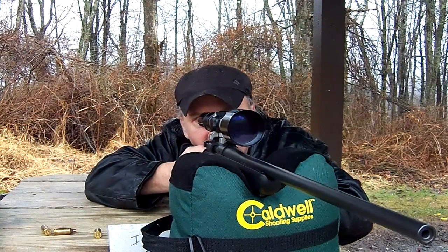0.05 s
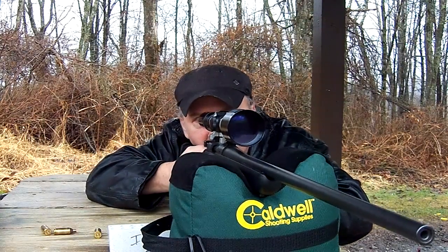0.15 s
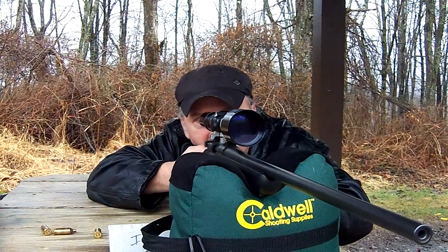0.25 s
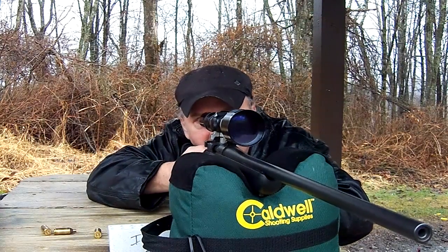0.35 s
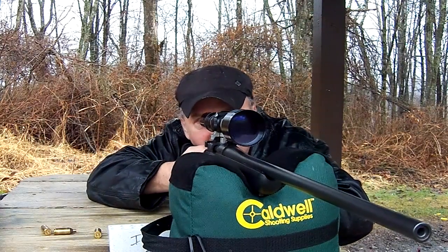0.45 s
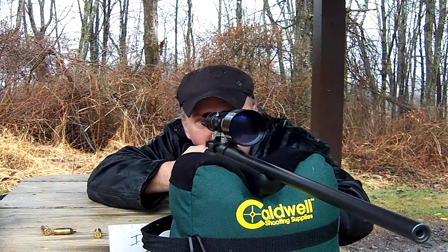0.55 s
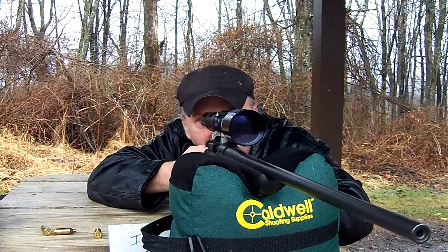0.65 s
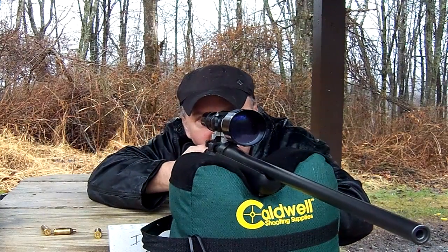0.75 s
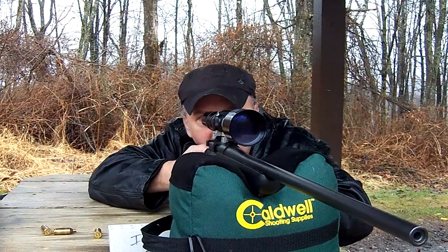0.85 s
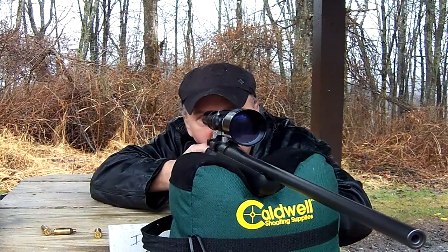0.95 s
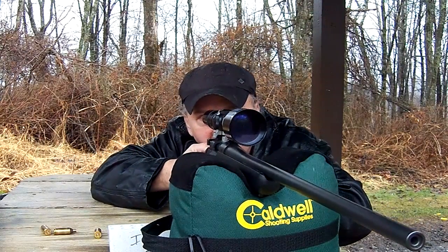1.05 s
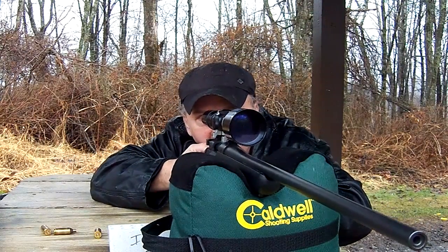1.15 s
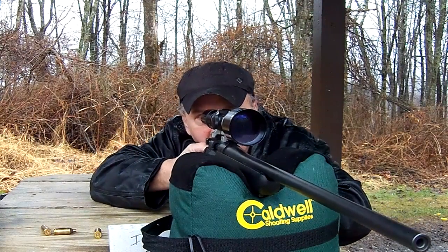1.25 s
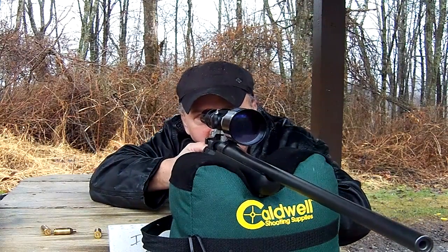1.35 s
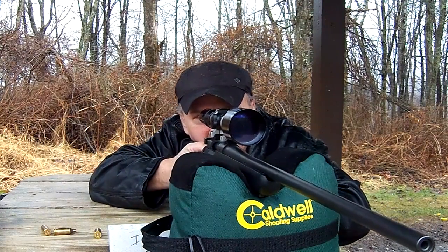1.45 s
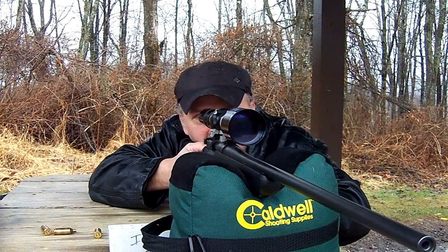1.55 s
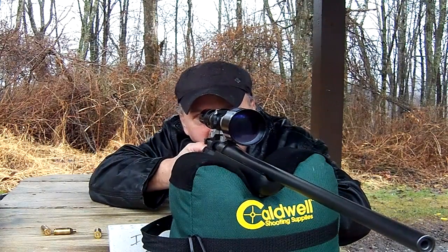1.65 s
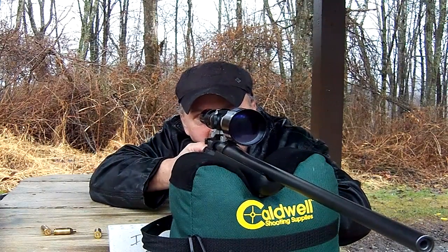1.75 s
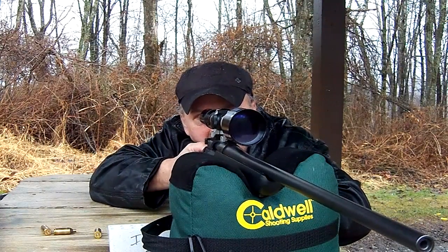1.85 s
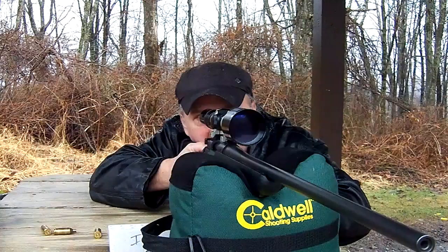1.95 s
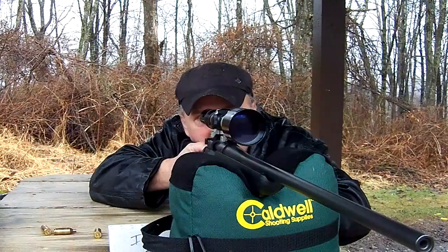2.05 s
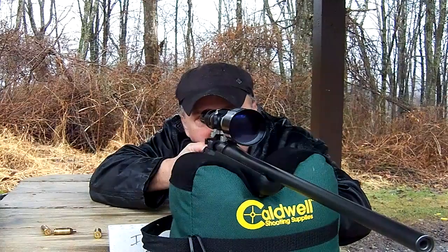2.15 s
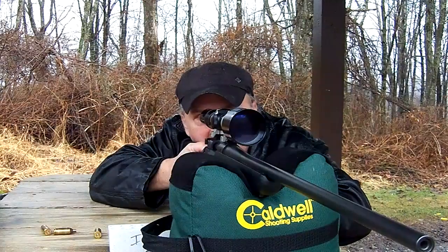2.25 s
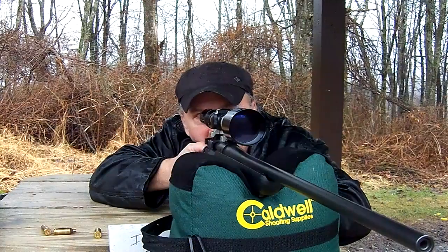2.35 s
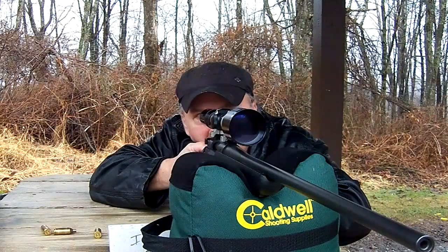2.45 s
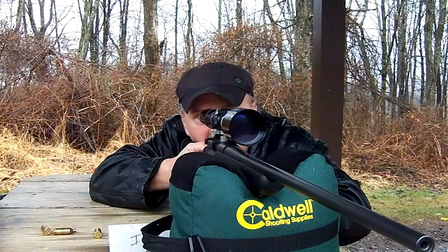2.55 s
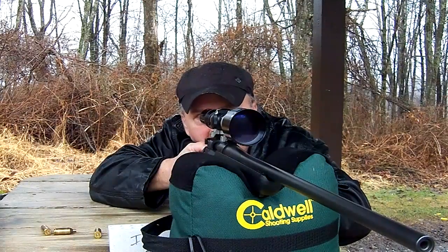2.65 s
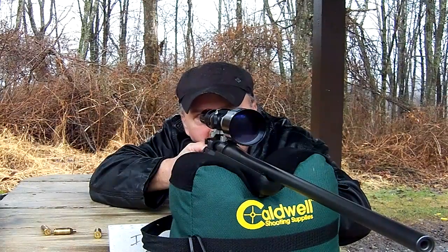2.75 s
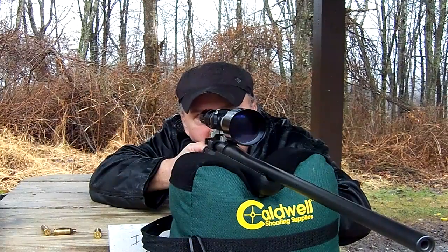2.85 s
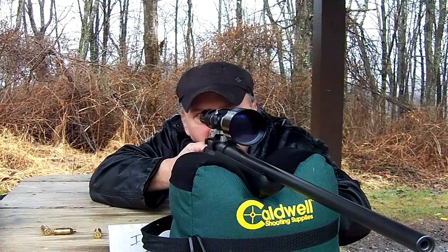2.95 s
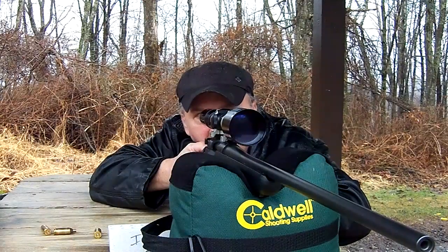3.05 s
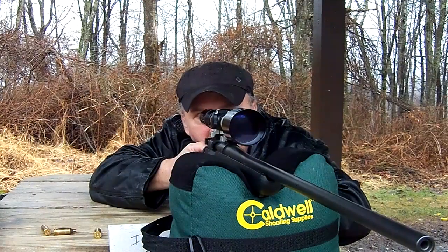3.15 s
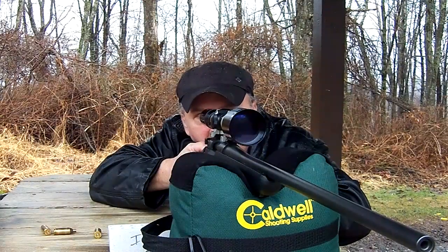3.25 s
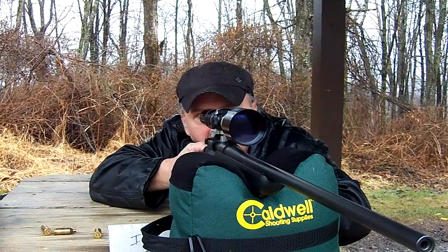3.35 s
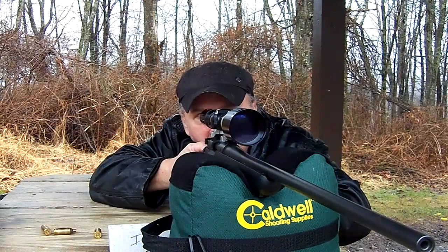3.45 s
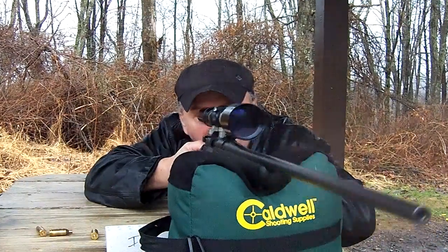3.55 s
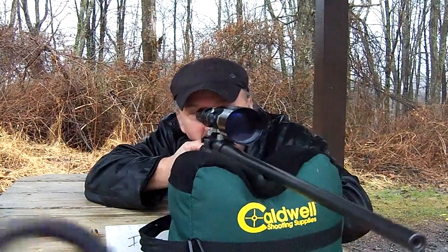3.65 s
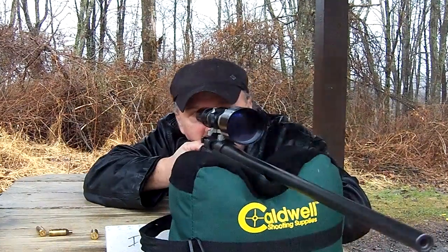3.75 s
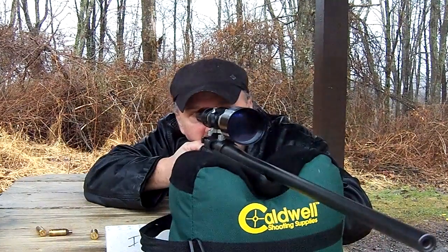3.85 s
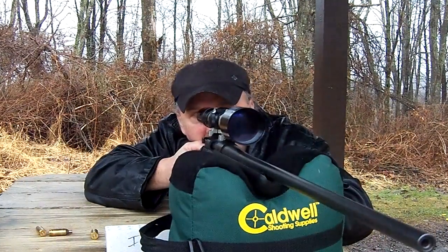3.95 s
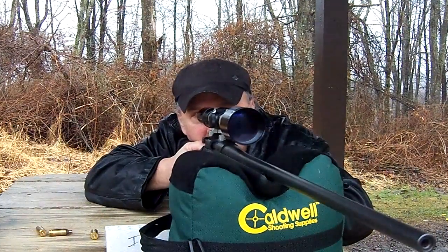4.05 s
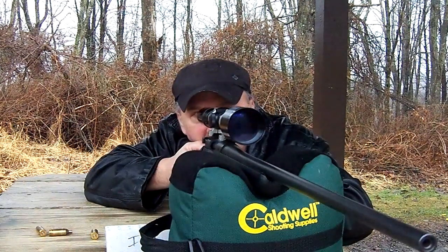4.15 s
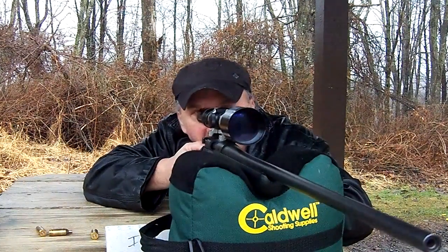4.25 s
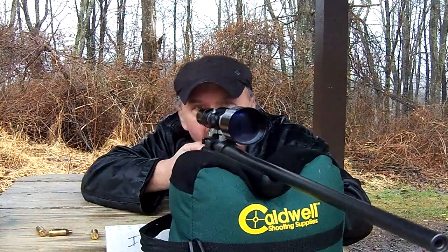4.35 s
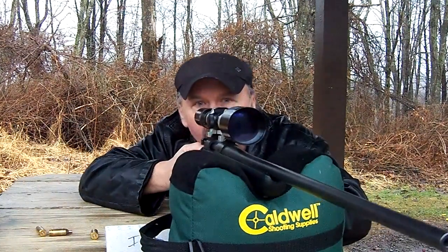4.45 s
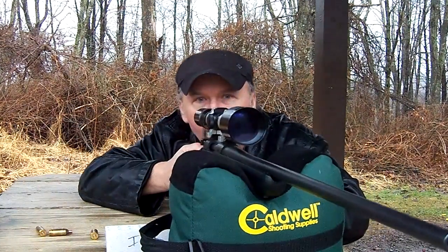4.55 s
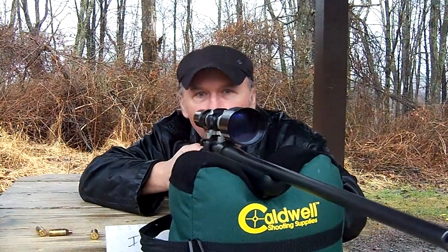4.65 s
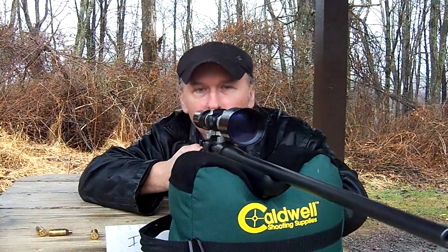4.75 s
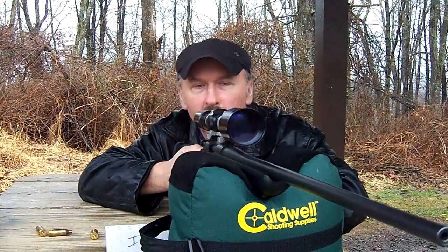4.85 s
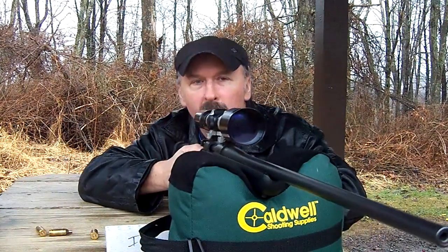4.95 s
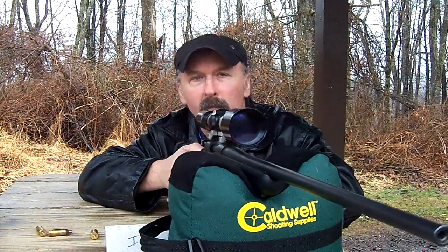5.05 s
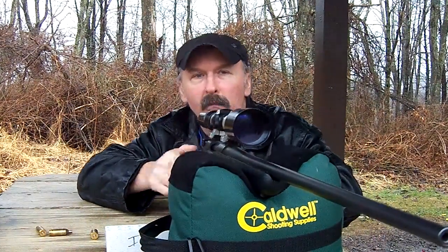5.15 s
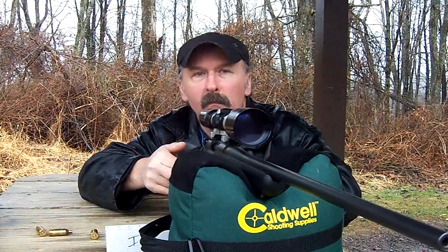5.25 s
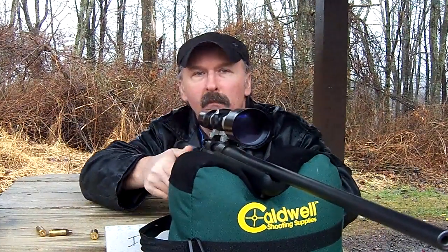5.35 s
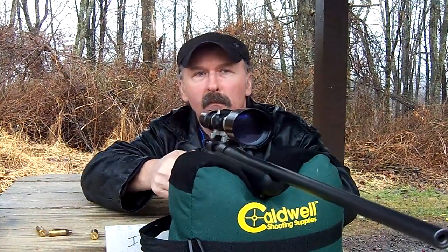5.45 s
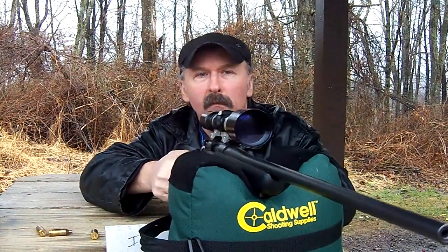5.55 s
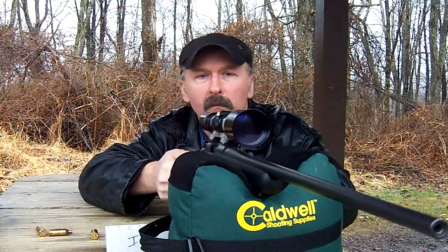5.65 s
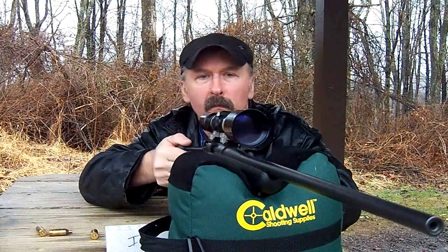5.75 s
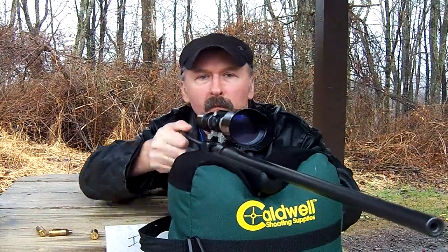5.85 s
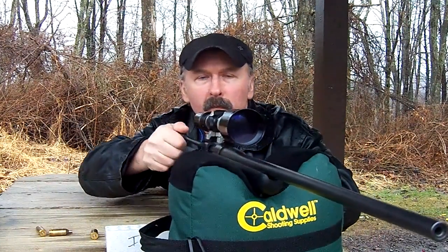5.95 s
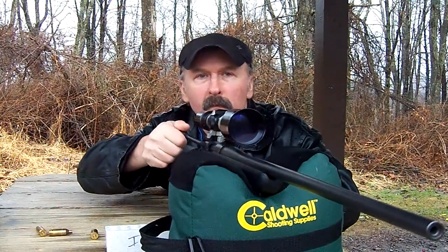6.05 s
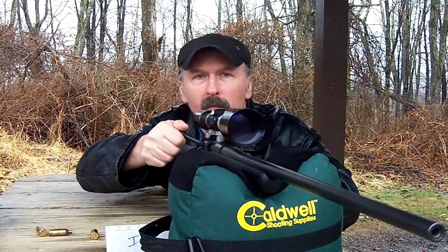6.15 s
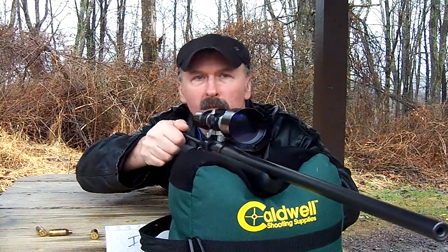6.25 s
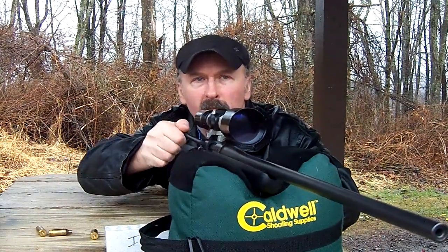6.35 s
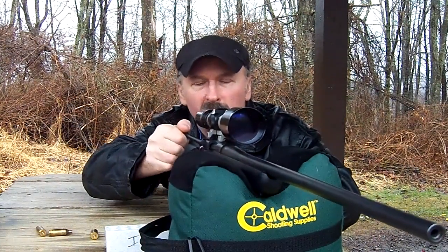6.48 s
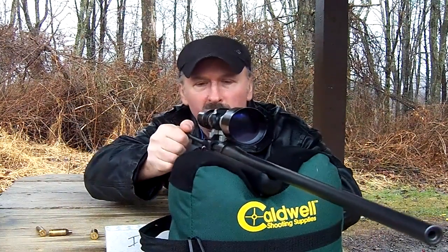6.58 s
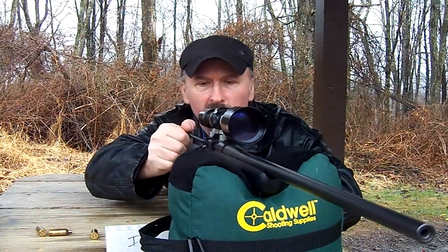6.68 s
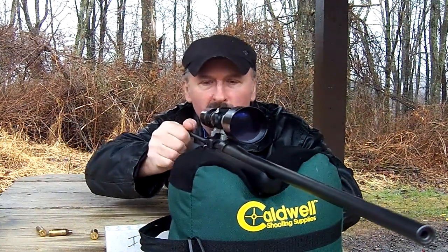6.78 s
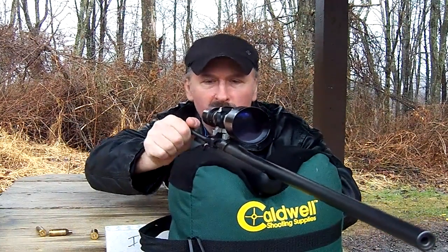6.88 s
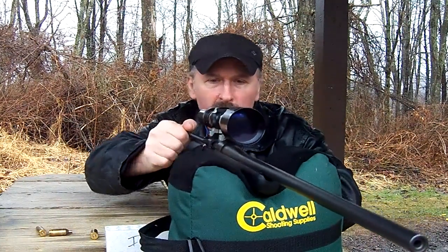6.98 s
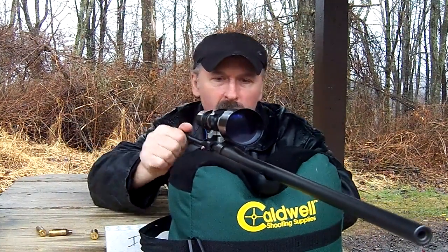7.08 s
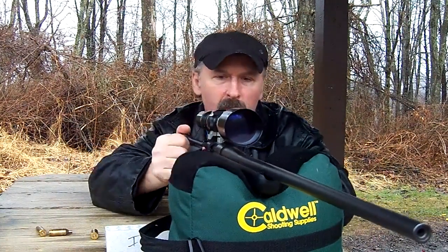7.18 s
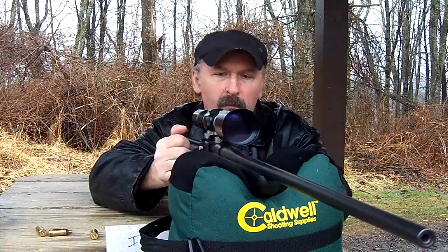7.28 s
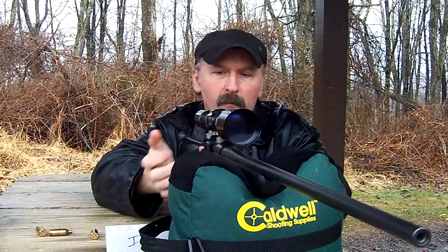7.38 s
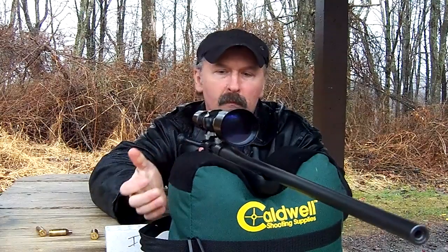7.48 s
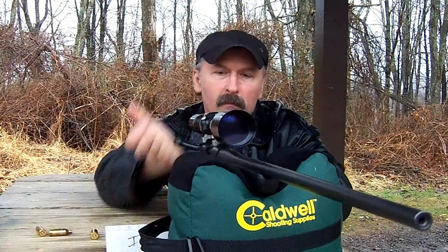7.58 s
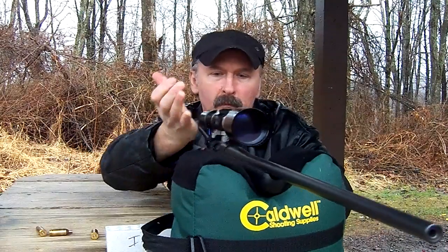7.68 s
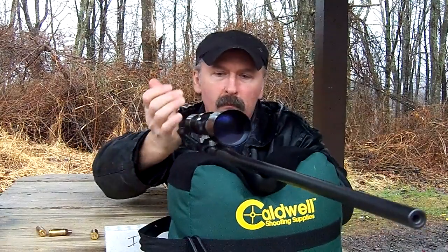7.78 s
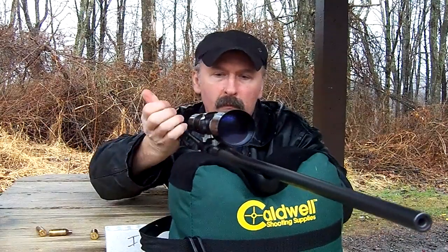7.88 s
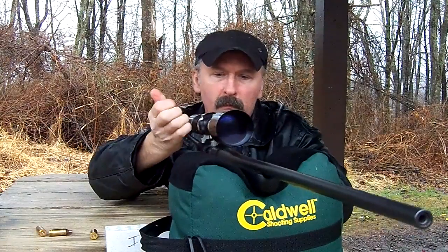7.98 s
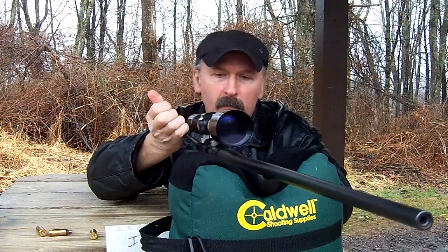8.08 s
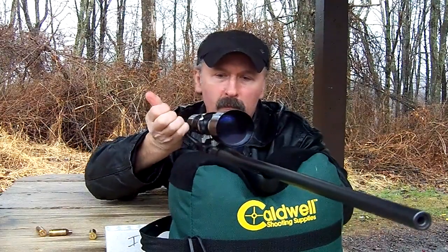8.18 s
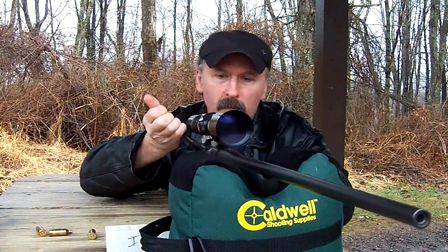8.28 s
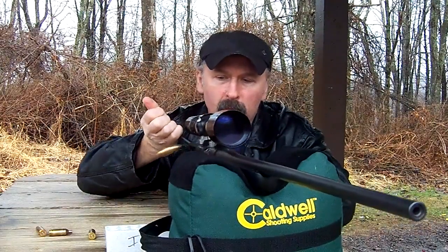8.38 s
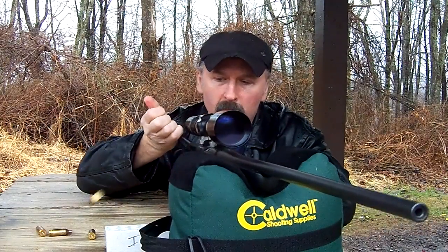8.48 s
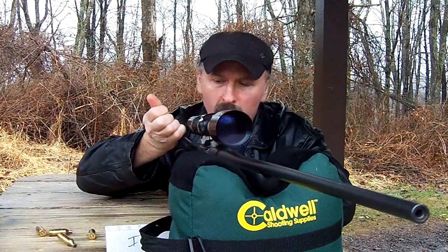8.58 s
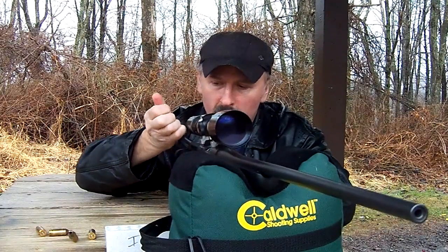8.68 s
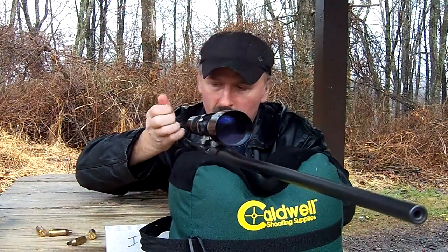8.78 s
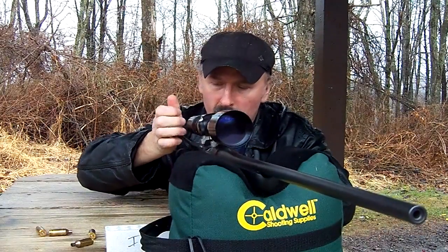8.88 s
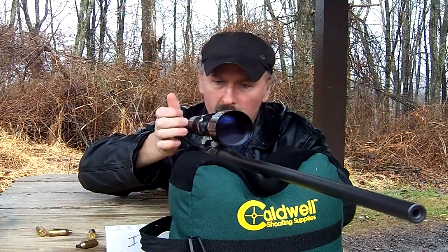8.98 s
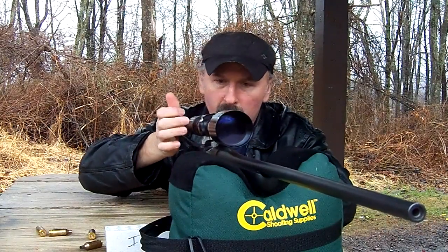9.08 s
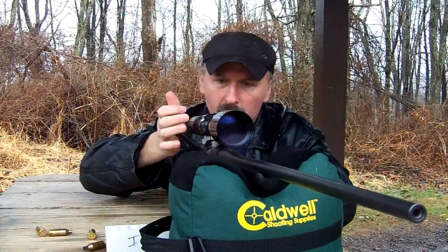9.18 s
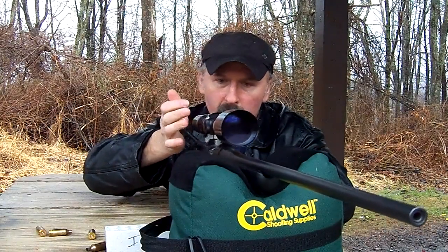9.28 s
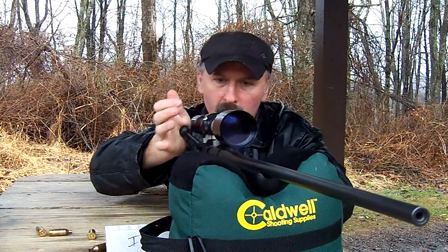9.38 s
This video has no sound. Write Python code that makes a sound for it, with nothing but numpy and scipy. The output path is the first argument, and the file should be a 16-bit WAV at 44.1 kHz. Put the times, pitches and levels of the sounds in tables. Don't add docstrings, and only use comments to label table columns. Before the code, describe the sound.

A close rifle blast breaks the quiet drizzle, rolls away among trees and slopes, followed by metallic bolt work and a spent case knocking wood.

```python
import sys
import numpy as np
from scipy import signal
from scipy.fft import rfft, irfft, next_fast_len
from scipy.io import wavfile
from scipy.ndimage import uniform_filter1d

SR = 44100
rng = np.random.default_rng(int(sys.argv[2]) if len(sys.argv) > 2 else 0)


def store_pcm(level_fs):
    pcm = np.round(np.clip(level_fs, -1, 1) * 32767).astype(np.int16)
    wavfile.write(sys.argv[1], SR, np.atleast_2d(pcm).T)


def gain_from_db(level_db):
    decades = np.asarray(level_db, float) / 20
    return 10 ** decades


N = 415422
T = np.arange(N) / SR
FIRED = 3.5495

# (frequency [Hz], level [dB per Hz])
HISS_TONE = [(880, -21.5), (1500, -3.5), (2040, -1.5), (2730, 0.5), (7630, -2.5), (12500, -7.5),
             (13400, -6.5), (14000, -13)]
# (frequency [Hz], level [dB per Hz])
WASH_TONE = [(150, -37), (250, -3.5), (312, 0), (409, -2), (643, -3.5), (1680, -10.5), (2500, -23),
             (3250, -49), (5500, -120)]
# (frequency [Hz], level [dB per Hz])
RUMBLE_TONE = [(12, -30.5), (20, -2), (70, -1), (166, -7), (236, -10), (258, -8.5), (285, -14), (400, -23),
               (520, -38), (880, -120)]
# (time [s], level [dB])
QUIET_GAIN = [(0, -0.5), (.55, -2), (1.5, 1), (2.4, 2.5), (3.5, 3.5), (3.8, -11), (5.8, -14), (6.45, -10),
              (6.8, -4), (7.38, 0), (7.6, 1), (7.8, -2), (8.27, -2.5), (8.42, -6.5), (9.04, -5),
              (9.42, -4.5)]
# (time [s], peak level [dB], note [Hz], splash [dB])
EARLY_DROPS = [(.0563, -28.5, 3400, 0), (.087, -37, 9000, -2), (.2633, -38, 4300, -3),
               (.3346, -36, 6430, -5), (.4179, -38, 5080, -18), (.7038, -42, 2740, 3.5),
               (.7871, -38, 6170, -6), (.8036, -39, 3490, 0), (1.0286, -34, 5960, -4.5),
               (1.3593, -29.5, 3680, -1.5), (1.4865, -24, 3580, -2.5), (1.6077, -35, 4160, -2),
               (1.6412, -34.5, 7900, -6), (1.9126, -38, 4060, -6), (2.0373, -28.5, 4600, -4),
               (2.144, -29.5, 8300, -7), (2.2458, -40.5, 3120, 5), (2.5252, -32.5, 9300, -11),
               (2.5631, -33, 4630, -9), (2.596, -43, 8500, -10), (2.6469, -28, 10300, -15),
               (2.7053, -32, 4230, -10), (2.7896, -44, 6500, 2), (2.8972, -40, 7330, 3),
               (2.916, -20.5, 3510, -4.5), (2.9891, -36, 5400, -4), (3.1018, -35, 3480, 3),
               (3.1353, -30, 7400, -6), (3.3807, -35, 8200, -13), (3.4002, -31, 8130, -3)]
# (time [s], peak level [dB], note [Hz], splash [dB])
LATER_DROPS = [(3.534, -38, 6960, 5.5), (4.6748, -44, 3380, 8), (4.8394, -43, 3400, 4.5),
               (5.2669, -55, 7500, 3), (5.5694, -42, 3960, -7), (5.8596, -44, 4560, -1),
               (5.9564, -42.5, 4650, -1), (6.4194, -41, 3270, -12.5), (6.6004, -33, 9400, -14),
               (6.7795, -37, 5200, -14), (6.88, -33, 9500, -20), (6.9346, -33, 6000, -11),
               (6.981, -35, 5630, 4), (7.013, -37, 3620, 1), (7.0994, -38, 5590, -2),
               (7.3854, -34, 3520, 5.5), (7.5707, -35.5, 3700, 10.5), (7.8194, -36, 2520, -2),
               (7.9234, -30, 11200, -20), (8.8994, -35, 11070, -7), (9.196, -32.5, 4160, -7)]
# (time [s], peak level [dB], note [Hz], splash [dB])
LEAF_SPRAYS = [(1.8173, -38.5, 3140, -4), (2.0118, -38, 4100, -4), (2.858, -40.5, 3520, 8),
               (3.4186, -37.5, 8900, -3), (3.5054, -32, 4600, -9), (6.62, -51, 4850, 4),
               (6.6678, -50.5, 4230, 9)]
# (time [s], peak level [dB], note [Hz])
PUDDLE_DRIPS = [(.126, -28.5, 964), (.369, -38.5, 1060), (1.527, -27.5, 835), (1.855, -34, 1140),
                (2.259, -36, 1140), (2.522, -34, 1010), (2.957, -32.5, 720), (2.98, -38, 700),
                (3.148, -25, 832)]
# (time [s], peak level [dB], note [Hz], time to fall 60 dB [s])
SECOND_NOTES = [(.0568, -43, 2600, .053), (1.3593, -41, 2090, .045), (1.4867, -29, 4900, 0.11),
                (2.9186, -24, 4600, 0.092), (2.919, -24.5, 11300, 0.093), (3.054, -26, 930, 0.024),
                (3.068, -26, 700, 0.045), (3.053, -22.5, 549, 0.037), (5.858, -44, 4500, 0.1),
                (5.859, -28.5, 1820, 0.05), (7.631, -15, 414, 0.1), (7.631, -21.5, 175, 0.081),
                (8.566, -28.5, 213, 0.1)]
# (time [s], length [s], level [dB], first pitch [Hz], last pitch [Hz])
BIRD_CALL = (2.799, .042, -44, 5450, 4450)
# (time [s], peak level [dB], centre [Hz],
# width [octaves], time to fall 60 dB [s])
TICKS_AND_SPECKS = [(1.029, -43, 6030, 0.094, .06), (1.4815, -22.5, 2500, 1, 0.017),
                    (1.488, -30, 11100, .04, 0.091), (1.616, -42, 3630, .05, .05), (2.013, -30, 3960, .04, 0.058),
                    (2.79, -20, 5500, 0.52, 0.01), (2.843, -31, 1270, 0.093, 0.076), (2.878, -30, 7500, .5, .01),
                    (2.888, -21, 5000, .4, 0.012), (2.897, -20, 6500, .5, 0.011), (2.912, -19, 3000, 0.89, 0.011),
                    (2.99, -34, 3500, .06, .05), (3.005, -33.5, 1080, .1, .06), (3.06, -33, 4000, .6, .04),
                    (3.095, -37, 9100, 0.027, .08), (3.108, -38, 12300, .03, .1), (3.177, -32, 10500, .3, .012),
                    (4.39, -49, 11000, 0.34, .05), (4.985, -47.5, 8500, .5, .05), (5.125, -49, 8470, 0.62, .05),
                    (5.27, -47, 8780, 0.55, .06), (5.366, -52, 8000, .4, 0.055), (5.748, -43.5, 4500, .1, .04),
                    (5.83, -47, 7500, 0.37, .04), (5.861, -28, 3980, 0.92, 0.016), (6.035, -42, 10040, 0.65, .015),
                    (7.0, -40, 3670, .05, .05), (6.68, -43, 4020, 0.63, 0.1), (7.02, -39, 4500, 0.69, 0.24),
                    (7.385, -36, 9600, 0.33, 0.11), (8.127, -38, 3200, .5, .03), (8.194, -21, 5500, 0.5, .02),
                    (8.334, -26, 415, 0.68, 0.063), (8.3735, -17, 6500, .9, .008), (9.2815, -34, 3530, .7, 0.015),
                    (9.23, -45, 1500, 0.45, .06), (9.237, -38, 7500, .3, .03), (9.254, -38, 10000, .5, .05),
                    (9.338, -49, 8800, .04, 0.046),
                    (.056, -36, 4940, .08, .06), (.057, -38, 8000, .3, .05), (.13, -40, 8500, .2, .015),
                (.178, -40, 7500, .25, .04), (.418, -38, 6500, .3, .025), (.6, -39, 8500, .3, .06),
                (.638, -38, 8000, .2, .04), (.727, -38, 6040, .08, .05), (.893, -39, 3000, .1, .06),
                (1.04, -35, 5600, .08, .05), (2.436, -36, 8100, .2, .02), (8.1485, -32, 2920, .06, .04),
                (8.15, -33, 5000, .08, .06), (8.1945, -20, 3280, 0.056, .04),
                (8.196, -20, 5080, 0.071, 0.066), (8.598, -34, 1530, .04, .15), (8.742, -44, 4200, .35, .1),
                (8.777, -40, 3200, .08, .04), (8.861, -38, 1750, .08, .06), (8.975, -36, 1740, .08, 0.086),
                (9.077, -39.5, 1750, .1, .06), (7.631, -22, 150, .5, 0.11), (5.86, -35, 3200, .03, 0.076),
                (8.645, -36, 4500, .4, .05), (8.789, -42, 4200, 0.46, 0.046), (2.25, -37, 3100, .05, .05),
                (8.334, -14, 10100, .25, .02), (9.063, -42, 4500, .3, .03), (9.083, -41, 5200, .15, 0.043),
                (9.251, -38, 6050, 1.2, .012)]
# (time [s], level [dB], note [Hz], time to fall 60 dB [s])
THIN_METAL_NOTES = [(7.631, -18, 887, 0.066), (7.631, -19, 1930, 0.088), (7.631, -15, 2390, 0.083),
                    (7.632, -20, 5470, .1), (7.632, -14, 6170, 0.09), (7.632, -5.5, 10770, .06),
                    (8.318, -34, 13900, .12), (8.33, -24, 13800, .06), (8.337, -20, 13800, 0.069),
                    (8.372, -35, 13880, 0.12), (8.39, -29, 13940, 0.11), (9.2475, -44.5, 4010, .08),
                    (9.282, -42, 2000, .04), (9.321, -47, 4830, .04), (9.371, -35, 12600, .05),
                    (9.379, -28, 3060, 0.12), (9.391, -22, 2940, 0.055), (9.394, -8.5, 9700, 0.05),
                    (9.407, -15, 2990, 0.06), (9.412, -16, 9700, .1)]
# (time [s], peak level [dB], low knock [dB], high knock [dB], tick [dB])
CASE_BOUNCES = [(8.5649, -8, -12, 0.5, -25), (8.6444, -23.5, -9.5, -6, -17), (8.742, -54, -18, 0, -3),
                (8.778, -43.5, -6, -3, -14), (8.789, -25, -14, 5, -11), (8.82, -27, -11.5, 3, -12),
                (8.86, -40, -7, 0, -14), (8.874, -43, -15, 3, -12), (8.975, -39, -13, 0, -20),
                (8.989, -45, -13, -2, -20), (9.005, -46, -2.5, -3, -25), (9.078, -44, -10, 0, -13)]
# (frequency [Hz], level [dB], time to fall 60 dB [s])
PLANK_NOTES = [(273, -9.5, 0.18), (425, -14, 0.11), (473, 0.5, 0.12), (547, 6.5, .033), (667, 2, 0.076),
               (893, -2, 0.082), (1040, -11, 0.098), (1130, -2, .08), (1275, 10, 0.057), (1490, 10, 0.038),
               (1680, 6, 0.034), (2250, 3.5, 0.055), (3905, -10, .045), (4550, -15, .045)]
# (frequency [Hz], width [Hz], level [dB])
STEEL_NOTES = [(2960, 110, 7.5), (3400, 110, -27), (5450, 130, -7), (6110, 91, 6), (7900, 83, -19.5),
               (9700, 90, -4), (10100, 300, -2), (13980, 360, -8)]
# (time [s], peak level [dB], time to fall 60 dB [s], loudest region [Hz])
BOLT_UNLOCK = [(7.618, -18, 0.1, 2500), (7.6245, -16, .05, 6500), (7.629, 2.5, 0.051, 3500),
               (7.632, 7, 0.047, 4500), (7.6436, 2.5, 0.032, 9600), (7.668, -16, .06, 9000)]
# (time [s], peak level [dB], time to fall 60 dB [s], loudest region [Hz])
BOLT_DRAW = [(7.997, -26.5, 0.041, 2360), (8.08, -35, .05, 5500), (8.1275, -33, 0.02, 4500),
             (8.131, -36, 0.11, 3200), (8.141, -41, .05, 8000), (8.1485, -25, 0.07, 3560),
             (8.162, -36, .08, 4500), (8.1755, -29, 0.17, 2000), (8.190, -24, .04, 4000),
             (8.1933, -15, .03, 3500), (8.1956, -19, 0.035, 4800), (8.2055, -26, .05, 5000),
             (8.213, -28, .04, 5000), (8.259, -35.5, 0.22, 2500), (8.28, -34, 0.14, 4470)]
# (time [s], peak level [dB], time to fall 60 dB [s], loudest region [Hz])
BOLT_EJECT = [(8.31, -16, .026, 4000), (8.316, -5.5, 0.03, 4360), (8.3262, -10, 0.025, 4500),
              (8.3333, -1.5, 0.06, 5900), (8.336, -13, 0.11, 5000), (8.3735, -11.5, 0.019, 5660),
              (8.378, -24, 0.065, 5950), (8.391, -38, 0.047, 6300)]
# (time [s], peak level [dB], time to fall 60 dB [s], loudest region [Hz])
BOLT_CLOSE = [(9.249, -43.5, .081, 4030), (9.2815, -36, .03, 3000), (9.3214, -45, .053, 4800),
              (9.3703, -17, 0.027, 12500), (9.3757, -15, 0.17, 5000), (9.388, -12, 0.035, 3000),
              (9.3899, -5.5, 0.04, 6100), (9.396, -5, .07, 8050), (9.4027, -6, 0.065, 8040),
              (9.4061, -8.5, 0.11, 3400), (9.4114, -4.5, 0.062, 8040)]
# (ring of the steel [dB], broad crack [dB])
BOLT_STROKES = [
    (-7, -2),
    (-8, 7),
    (-14, -0.5),
    (3.5, 0),
]
# (frequency [Hz], level [dB per Hz])
BLAST_TONE = [(180, -36.5), (300, -2), (423, -4), (559, -7.5), (616, -5), (4540, -15), (12100, -34),
              (14300, -45), (15000, -115)]
# (level [dB], time to fall 60 dB [s])
TREE_ECHOES = [
    (3.5, 0.38),
    (-10, 1.695),
    (-24.5, 5.27),
]
# (frequency [Hz], loss [dB per s of travel])
AIR_DULLING = [(500, 4), (1000, 2.5), (1500, -4), (3000, 5.5), (5000, 19), (8000, 42), (10500, 67.5),
               (13000, 100.5)]
# (frequency [Hz], level [dB per Hz])
BOOM_TONE = [(29, -51), (48, -13.5), (95, -12.5), (132, 3.5), (175, -4), (260, -2), (353, 3.5), (431, -6.5),
             (585, 1.5), (677, -14), (1200, -17.5), (1560, -47.5), (2640, -120)]
# (frequency [Hz], level [dB per Hz])
ROLL_TONE = [(24, -47), (40, -17.5), (189, 3.5), (343, -2.5), (463, -17), (521, -9), (676, -16), (740, -10),
             (900, -14.5), (1170, -52), (1980, -120)]
# (delay [s], level [dB], spread [s])
FAR_SLOPES = [
    (0.399, -29, .25),
    (1.45, -37, .6),
    (2.5, -49.5, 1.1),
]
# (delay [s], rise [dB])
SLAP_ECHOES = [(.503, 2), (.62, 4), (.70, 6), (.797, 14), (.89, 9), (1.155, 5), (1.369, 7.5), (1.5, 4),
               (1.66, 3.5), (1.85, 4), (2.03, 4), (2.2, 6)]
# (time [s], level [dB])
OVERLOAD_POINT = [(3.55, -5.2), (3.575, -4.1), (3.63, -4.2), (3.7, -7.6), (3.8, -8.6), (3.97, -9.6),
                  (4.04, -7), (6.2, -7), (7, -4), (7.7, -4), (8.3, -5.5), (9.3, -8)]


def unit(x):
    return x / np.sqrt(np.mean(x ** 2) + 1e-20)


def along(points, hz):
    f, v = np.transpose(points)
    return np.interp(np.log(hz + 1), np.log(f + 1), v)


def curve(points):
    return np.interp(T, *np.transpose(points))


def filtered(x, response):
    m = next_fast_len(len(x) + 8192)
    return irfft(rfft(x, m) * response(np.fft.rfftfreq(m, 1 / SR)), m)[:len(x)]


def hump(hz, octaves):
    return lambda f: np.exp(-(np.log2((f + 1) / hz) / octaves) ** 2)


def rush(spectrum, patchy_db):
    z = signal.stft(rng.standard_normal(N), nperseg=512)[2]
    field = uniform_filter1d(rng.standard_normal(z.shape), size=8, axis=0)
    field = uniform_filter1d(field, size=6, axis=1)
    patchy = signal.istft(z * gain_from_db(patchy_db * unit(field)), nperseg=512)[1][:N]
    return unit(filtered(patchy, lambda hz: gain_from_db(along(spectrum, hz))))


def add(track, s, sound):
    part = track[round(s * SR):][:len(sound)]
    part += sound[:len(part)]


def fade(t, t60, rise):
    return gain_from_db(-60 * t / max(t60, .005)) * (1 - np.exp(-t / rise))


def lingering(db, loss_db_per_s):
    return np.sqrt(1 + (T > FIRED) * gain_from_db(db - loss_db_per_s * (T - FIRED)) ** 2)


def rain():
    patter = np.zeros(N)
    t = np.arange(1500) / SR
    for s, size, pitch in rng.random((170, 3)):
        grit = unit(filtered(rng.standard_normal(len(t)), hump(4000 * 2.9 ** pitch, octaves=.5)))
        level_db = -6 * np.log10(size + .05)
        add(patter, s * N / SR, grit * fade(t, 0.048, .0015) * gain_from_db(level_db))
    hum = gain_from_db(-8.0) * np.sin(2 * np.pi * 237.5 * T)
    near = gain_from_db(-50.5) * (rush(HISS_TONE, patchy_db=2.0) + 0.98 * patter)
    wash = gain_from_db(-54) * rush(WASH_TONE, patchy_db=0.54) * lingering(29.5, 6.74)
    low = gain_from_db(-49) * (rush(RUMBLE_TONE, patchy_db=0.25) * lingering(15, 5.9) + hum)
    return gain_from_db(curve(QUIET_GAIN)) * (near + wash + low)


def drops():
    track, t = np.zeros(N), np.arange(SR // 8) / SR
    kinds = [(EARLY_DROPS, 0.077), (LATER_DROPS, 0.04), (LEAF_SPRAYS, 0.31)]
    falls = [(s, db, hz, t60, splash_db) for rows, t60 in kinds for s, db, hz, splash_db in rows]
    falls += [(s, db, hz, 0.06, -30) for s, db, hz in PUDDLE_DRIPS]
    falls += [(*row, -5.5) for row in SECOND_NOTES]
    for s, db, hz, t60, splash_db in falls:
        noise = rng.standard_normal((3, len(t)))
        note = unit(filtered(noise[0], hump(hz, octaves=0.048 + 0.14 * hz / 4000)))
        splash = unit(filtered(noise[1], lambda f: f / (f + 1500) / (1 + (f / 8000) ** 3)))
        grain = gain_from_db(3.3 * unit(uniform_filter1d(noise[2], size=90)))
        drop = (note + gain_from_db(splash_db) * splash * grain) * fade(t, t60, 0.0024)
        add(track, s - .001, gain_from_db(db - 7.5) * drop)
    return track


def bird():
    s, length, db, from_hz, to_hz = BIRD_CALL
    u = np.arange(round(length * SR)) / (length * SR)
    pitch = to_hz + (from_hz - to_hz) * (1 - u)
    whistle = np.sin(2 * np.pi * np.cumsum(pitch) / SR)
    track = np.zeros(N)
    add(track, s, gain_from_db(db) * np.sin(np.pi * u) * whistle)
    return track


def ticks():
    track, t = np.zeros(N), np.arange(SR // 10) / SR
    for s, db, hz, width, t60 in TICKS_AND_SPECKS:
        grit = unit(filtered(rng.standard_normal(len(t)), hump(hz, octaves=max(width, .02))))
        add(track, s - .0005, gain_from_db(db - 9) * grit * fade(t, t60, .0005))
    return track


def thin_metal():
    track, t = np.zeros(N), np.arange(SR // 4) / SR
    for s, db, hz, t60 in THIN_METAL_NOTES:
        waver = gain_from_db(2.4 * unit(uniform_filter1d(rng.standard_normal(len(t)), size=200)))
        add(track, s, gain_from_db(db) * waver * np.sin(2 * np.pi * hz * t) * fade(t, t60, 0.00065))
    return track


def plank_ring(t, low_db, high_db):
    ring = np.zeros(len(t))
    for hz, level, t60 in PLANK_NOTES:
        level_luck, pitch_luck = rng.standard_normal(2)
        db = level - 5.5 + 0.82 * level_luck + (low_db + 15.0) * (hz < 950) + high_db * (hz > 1600)
        tone = np.sin(2 * np.pi * hz * t * (1 + 0.0043 * pitch_luck))
        ring += gain_from_db(db) * tone * fade(t, 1.27 * t60, 0.00035)
    return ring


def bounces():
    track, t = np.zeros(N), np.arange(SR // 4) / SR
    for s, db, low_db, high_db, tick_db in CASE_BOUNCES:
        ring = plank_ring(t, low_db, high_db)
        contact = rng.standard_normal(len(t)) * gain_from_db(-60 * t / .0015)
        contact /= np.linalg.norm(contact)
        knock = ring + 0.2 * signal.fftconvolve(ring, contact)[:len(t)]
        knock *= .9 + .2 * unit(uniform_filter1d(rng.standard_normal(len(t)), size=130))
        tick = gain_from_db(tick_db + 2) * rng.standard_normal(len(t)) * fade(t, 0.045, .0003)
        rattle = gain_from_db(-2) * unit(filtered(rng.standard_normal(len(t)), hump(1170, octaves=1.3)))
        rattle *= fade(t, 0.051, 0.00079) + 0.15 * fade(t, 0.26, .004)
        bounce = filtered(knock + tick + rattle, lambda f: (1j * f / (220 + 1j * f)) ** 2)
        add(track, s, gain_from_db(db - 10.0) * bounce)
    return track


def steel_body(f):
    total = 0
    for k, (centre, width, db) in enumerate(STEEL_NOTES):
        damping = 1j * f * width
        total = total + (-1) ** k * gain_from_db(db) * damping / (centre * centre - f * f + damping)
    return total


def bolt():
    track, t = np.zeros(N), np.arange(SR // 5) / SR
    for rows, (ring_db, crack_db) in zip([BOLT_UNLOCK, BOLT_DRAW, BOLT_EJECT, BOLT_CLOSE], BOLT_STROKES):
        for s, db, t60, hz in rows:
            broad = gain_from_db(crack_db + 0.43 * db)

            def colour(f):
                crack = broad * f ** 2 / (f ** 2 + 400 ** 2) / (1 + (f / 11000) ** 4)
                return (gain_from_db(ring_db) * steel_body(f) + 1) * (hump(hz, octaves=.95)(f) + crack)

            blow = unit(filtered(rng.standard_normal(len(t)), colour))
            shape = fade(t, t60, 0.00053) + gain_from_db(-15.5) * fade(t, 0.18, 0.0038)
            add(track, s - .0005, gain_from_db(db - 9.5) * blow * shape)
    return track


def slap_levels(since):
    slaps_db = sum(db * np.exp(-((since - delay) / 0.0069) ** 2) for delay, db in SLAP_ECHOES)
    return slaps_db - 4.5 * np.exp(-((since - 0.73) / 0.2) ** 2)


def tree_echoes(since):
    hz, t, z = signal.stft(rush(BLAST_TONE, patchy_db=1.1), SR, nperseg=256)
    hz = hz[:, None]
    age = np.clip(t - FIRED, 0, 2.5)
    tone_db = -along(AIR_DULLING, hz) * (age - .4).clip(-.15) / (1 + 0.21 * age)
    tone_db -= 11.5 * np.exp(-(age / 0.014) ** 2) / (1 + (hz / 4500) ** 2)
    crack_hz = 500 + 12000 * np.exp(-age / .014)
    crack = gain_from_db(7 - 60 * age / 0.1) * np.exp(-(np.log((hz + 1) / crack_hz) / 0.55) ** 2)
    woods = signal.istft(z * (gain_from_db(tone_db) + crack), SR, nperseg=256)[1][:N]
    echoes = np.sqrt(sum(gain_from_db(db - 60 * since / t60) ** 2 for db, t60 in TREE_ECHOES))
    echoes *= 1 - 0.86 * np.exp(-since / .03)
    echoes *= gain_from_db(-9 * (since - 1.8).clip(0))
    return woods * echoes * (1 - np.exp(-(since / 0.0014) ** 2))


def ground_and_slopes(since, slaps_db):
    rolls = sum(gain_from_db(db) ** 2 * np.exp(-((since - delay) / spread) ** 2) for delay, db, spread in FAR_SLOPES)
    ground = gain_from_db(-3.5 - 60 * since / 0.38)
    far = rush(ROLL_TONE, patchy_db=1.5) * np.sqrt(rolls + ground ** 2)
    far *= gain_from_db(slaps_db - 1 * (since > 2))
    boom = rush(BOOM_TONE, patchy_db=4.5) * gain_from_db(4.0 - 60 * since / 0.34)
    late = 1 - np.exp(-(since / 0.04) ** 4.5)
    return late * (far + boom)


def muzzle_push(since):
    u = (since - .0022).clip(0) / .0008
    push = gain_from_db(-2.5) * u * np.exp(1 - u) * (1 - .35 * u)
    return push + gain_from_db(-11) * np.sin(2 * np.pi * 40 * since) * fade(since, .15, .004)


def shot():
    since = (T - FIRED).clip(0)
    slaps_db = slap_levels(since)
    excess_db = 12 * np.exp(-(since / 0.55) ** 1.7)
    near = tree_echoes(since) * gain_from_db(0.15 * slaps_db)
    return (near + ground_and_slopes(since, slaps_db)) * gain_from_db(excess_db) + muzzle_push(since)


def scene():
    handling = ticks() + thin_metal() + bounces() + bolt()
    return np.tile(rain() + drops() + bird() + handling + shot(), (2, 1))


def thin_treble(x):
    hz, t, z = signal.stft(x, SR, nperseg=1024)
    share = .45 * np.exp(-((t - 4.25) / .33) ** 2) * np.clip(hz[:, None] / 8000 - .7, 0, 1.3)
    luck = rng.random((len(hz) // 5 + 1, len(t) // 4 + 1))
    luck = np.kron(luck, np.ones((5, 4)))[:len(hz), :len(t)]
    kept = luck > share * (t > FIRED + .1)
    return signal.istft(z * kept, SR, nperseg=1024)[1][:N]


def channel_slip():
    side, window = np.zeros(N), np.hanning(round(.046 * SR))
    band = lambda f: np.exp(-((f - 4700) / 520) ** 6)
    add(side, 3.777, gain_from_db(-24) * window * unit(filtered(rng.standard_normal(len(window)), band)))
    return np.array([side, -side])


def band_limit(x):
    return signal.sosfilt(signal.butter(12, 16640, fs=SR, output="sos"), x)


def record(dry):
    top, hardness = gain_from_db(curve(OVERLOAD_POINT)), 6
    clipped = dry[0] / (1 + np.abs(dry[0] / top) ** hardness) ** (1 / hardness)
    kept = filtered(clipped, lambda hz: 1 / (1 + np.exp(np.clip((hz - 14050) / 60, -50, 50))))
    loud = uniform_filter1d(clipped ** 2, size=400) > gain_from_db(-17)
    full_gain = top + (T < FIRED + .03) > gain_from_db(-4.25)
    gate = uniform_filter1d(1. * (loud & full_gain), size=300)
    rest = filtered(clipped * gate, lambda hz: np.exp(-((hz - 15000) / 800) ** 4))
    return band_limit(thin_treble(kept + gain_from_db(-9.5) * rest) + channel_slip())


dry = scene()
out = record(dry)
store_pcm(out)
```